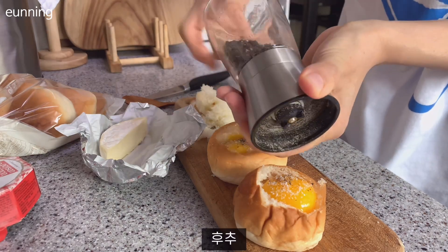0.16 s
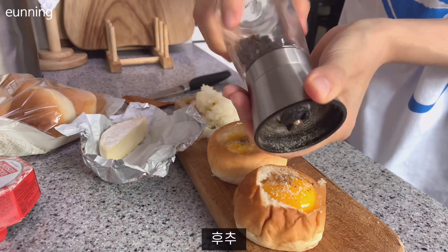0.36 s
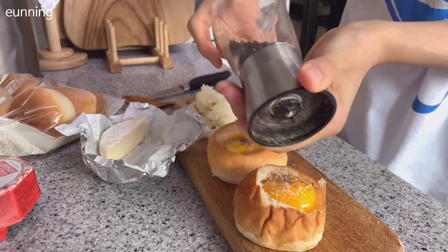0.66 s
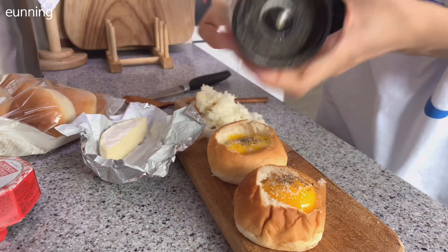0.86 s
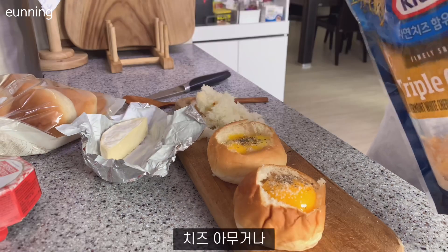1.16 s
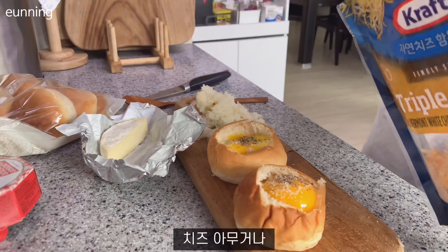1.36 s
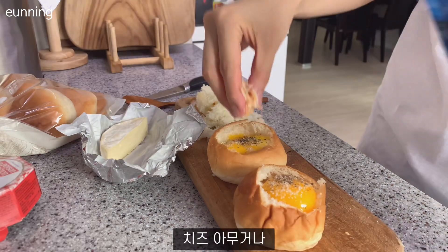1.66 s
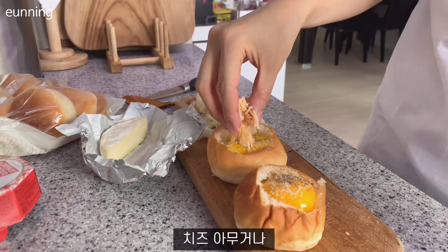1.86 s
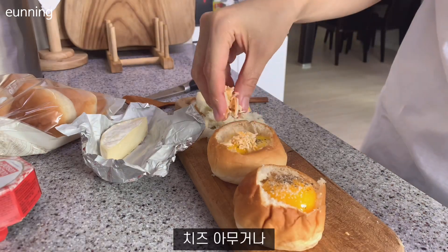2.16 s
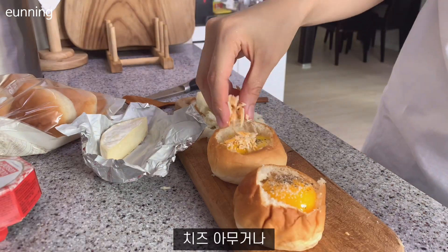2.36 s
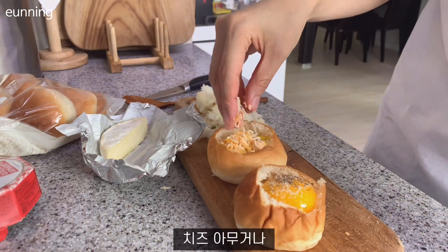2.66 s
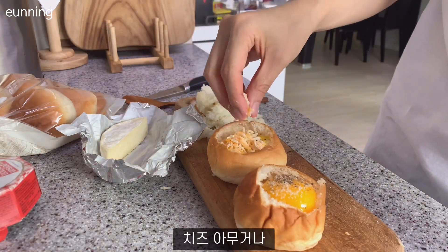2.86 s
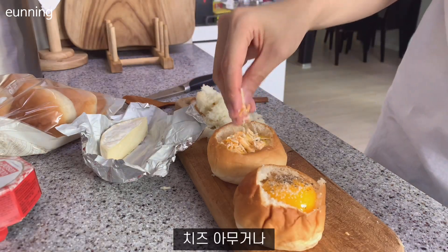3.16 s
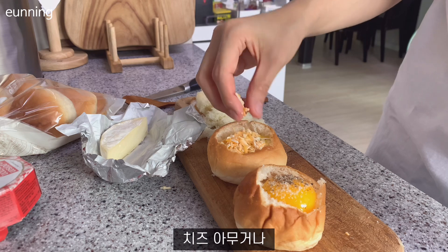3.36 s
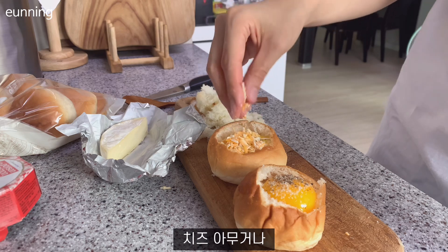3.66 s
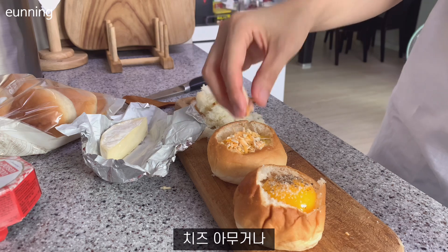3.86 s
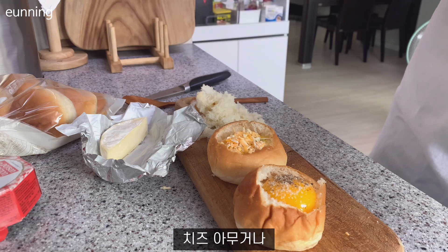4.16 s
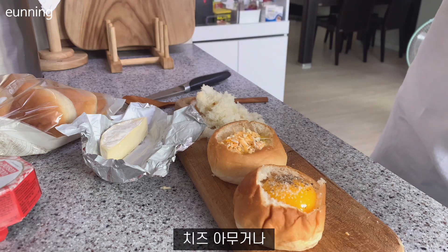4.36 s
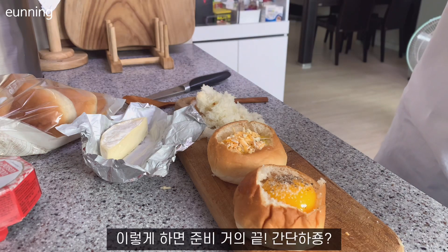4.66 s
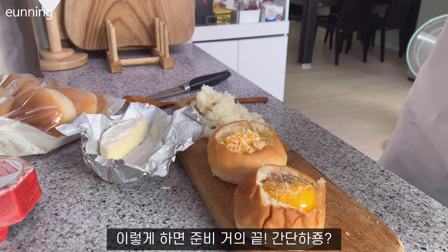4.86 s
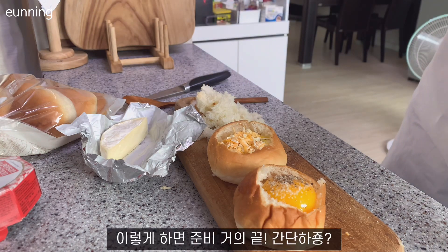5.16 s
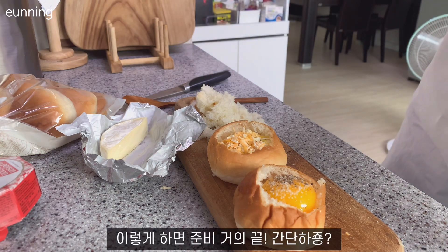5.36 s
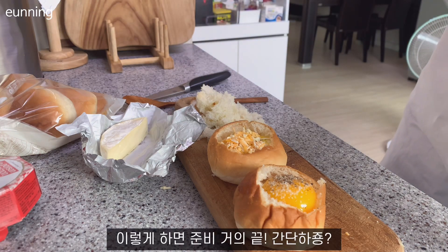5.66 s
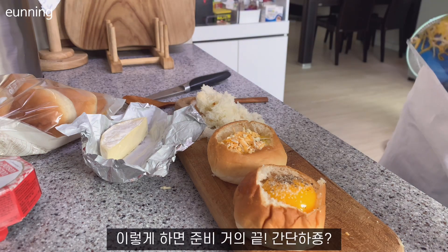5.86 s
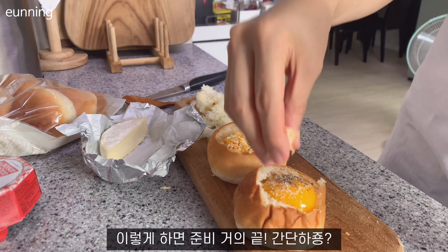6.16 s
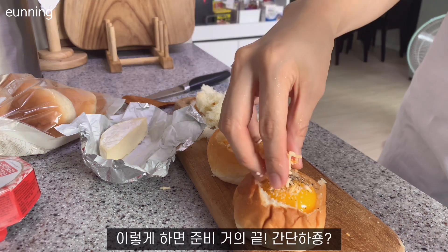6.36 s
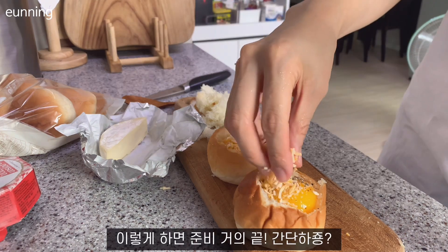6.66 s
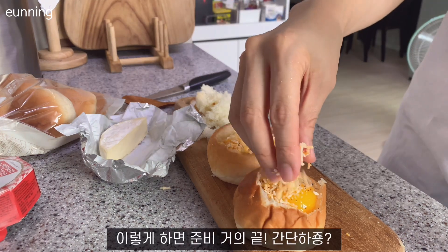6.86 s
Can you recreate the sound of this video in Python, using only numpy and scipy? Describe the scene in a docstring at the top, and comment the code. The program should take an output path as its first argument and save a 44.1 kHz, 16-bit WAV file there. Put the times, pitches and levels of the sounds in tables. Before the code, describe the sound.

Corns tinkle on glass and crack in a turning mill, with the sound abruptly cut before one second. A few isolated plastic creases follow over steady low rumble and faint airy hiss. After a tiny dropout near four seconds, a filled bag rustles and snaps thickly for nearly two seconds, with soft low thumps, then settles; one late crease. Close, small stereo microphones in a kitchen.

```python
"""In a small kitchen humming with appliances, a pepper mill twisted over bread rolls is heard for just under a second:
corns crack as clicks that ring the mill body, and tinkle as tiny hits on narrow glass tones. The mill sound ends
abruptly; then a plastic bag of grated cheese snaps now and then. From about 4.2 s it is worked hard, with rustling
of dense tiny slips and soft low thumps, and one late crease near 6.9 s. The sound drops out briefly at 0.95 and
4.04 s. Two microphone ports a few centimetres apart hear it all, the left one slightly later."""
import sys
import numpy as np
from scipy import signal
from scipy.fft import rfft, irfft
from scipy.io import wavfile

SR = 44100
rng = np.random.default_rng(int(sys.argv[2]) if len(sys.argv) > 2 else 0)


def inscribe(sig):
    """Save sig as 16-bit PCM at rate SR to the path in sys.argv[1].

    A 1-D sig is mono; a 2-D sig holds one channel per row.
    Samples are clipped to [-1, 1] before scaling.
    """
    pcm = np.round(np.clip(np.atleast_2d(sig).T, -1, 1) * 32767)
    wavfile.write(sys.argv[1], SR, pcm.astype(np.int16))


N = 308700
TIME = np.arange(N) / SR  # s
HZ = np.maximum(np.fft.rfftfreq(N, 1 / SR), 1)

# Levels of mill and bag parts are those before the path to the ports (PATH_COLOUR).
# kitchen background, louder while the bag is worked: [t/s, rumble with hum level/dB]
ROOM_LEVEL = [(0.0, -46.5), (4.1, -46.5), (4.6, -43.5), (5.2, -43), (5.36, -48.5), (5.5, -43), (5.67, -43),
              (5.88, -44), (6.3, -46.5), (7.0, -45)]
# spectrum shape of the rumble: [f/Hz, relative level per Hz/dB]
RUMBLE_SHAPE = [(24, -35), (33, -5.5), (48, -12), (62, -2.5), (85, -12.5), (125, -10), (170, -18),
                (240, -19.5), (300, -24.5), (400, -32)]
# motor tones: [f/Hz, width/Hz, level/dB on the scale where the rumble is RUMBLE_MIX_DB]
MOTOR_TONES = [(55.5, 9, -55), (72.85, 7.1, -55.5), (110, 9.1, -59), (141.84, 8.6, -55.5),
               (256.95, 6.66, -61.5), (281.8, 15, -66), (643.5, 4.5, -75)]
RUMBLE_MIX_DB = -50.5  # only sets rumble against tones
# spectrum shape of the airy hiss: [f/Hz, relative level per Hz/dB]
AIR_SHAPE = [(250, -7.5), (420, -4), (620, 0), (900, -4.5), (1250, 0), (1900, -9), (2400, -12), (3500, -19),
             (5000, -19.5), (5800, -19), (6800, -28.5), (9000, -29.5), (15000, -35), (15800, -54)]
AIR_DB = -61.5  # wavers a little around this

# the pair of ports: [f/Hz, likeness for the background (0-1), likeness for near sounds (0-1),
# left minus right level/dB, extra left lag/rad]
PORT_PAIR = [(60.3, 1, 0.7, -1, 0.07), (207, 0.96, 0.78, 0.5, -0.04), (405, 0.32, 0.47, -1, 0.15),
             (525, 0.22, 0.47, -4.5, -0.45), (710, 0.16, 0.72, 0, 1.05), (970, 0.02, 0.73, -0.5, 1.94),
             (2540, 0, 0.4, -0.5, -1.45), (3880, 0.08, 0.71, -1, -0.9), (4880, 0, 0.22, -1, -2.3),
             (6400, 0, 0.1, -3.5, -1.5), (8500, 0.63, 0.74, -1.5, -0.8), (10540, 0.8, 0.87, 1.5, 0.5),
             (11600, 1, 1, -2, -0.28), (13400, 1, 0.85, 1, -0.1), (15000, 1, 0.84, -3, -1)]
LEFT_LAG_S = 8 / SR
# path from mill and bag to the ports: [f/Hz, gain/dB]
PATH_COLOUR = [(350, -3.5), (700, -1), (1000, -6), (1300, -3), (5000, -4.5), (8000, -4.5), (9000, -3.5),
               (10500, -5), (13000, -7.5), (15500, -11)]
# mill, and bag at first, are further left: less lag, below this pitch
LEFT_SHIFT_S, SHIFT_TOP_HZ = -0.00014, 6600
BAG_LEFT_UNTIL_S = 4
PAN_DB, PAN_SPREAD_DB = -1, 2  # where cracks and snaps fall, left minus right

# pitch ranges called lows, mids, upper mids, highs: [low edge f/Hz, high edge f/Hz]
REGISTER_EDGES = [(400, 1700), (1700, 3500), (3500, 6500), (6500, 15800)]
LOW_TOP_HZ, MID_TOP_HZ = 1850, 3200  # limits of low and mid tones in rubbing sounds
ATTACK_SAMPLES = round(.004 * SR)

# corns cracking in the burr: [t/s, low ring f/Hz, high ring f/Hz,
# attack level/dB in lows, mids, upper mids, highs]
CORN_CRACKS = [(0.3417, 1400, 3700, -65, -35, -38, -44), (0.3625, 506, 3570, -55, -46, -45, -40),
               (0.3973, 1640, 2990, -38, -26, -27.5, -23), (0.4105, 1650, 3290, -49, -50, -46, -43),
               (0.4201, 1600, 3370, -47.5, -41, -41.5, -39), (0.878, 480, 6200, -60, -73, -55, -45),
               (0.9328, 1500, 4900, -52, -64, -60, -50)]
# single corns on the glass: [t/s, strength/dB before TINK_LIFT_DB and the glass tones]
CORN_TINKS = [(0.006, -43), (0.0112, -44), (0.019, -44), (0.032, -39), (0.0381, -42), (0.046, -39),
              (0.052, -41), (0.0555, -36), (0.0673, -39), (0.0711, -39), (0.0801, -47), (0.083, -41),
              (0.1174, -35.5), (0.4587, -37), (0.464, -44), (0.472, -34), (0.4807, -35), (0.4861, -39),
              (0.4912, -26.5), (0.5024, -34), (0.508, -40), (0.5119, -39), (0.517, -37), (0.5196, -38),
              (0.5285, -43), (0.5327, -30), (0.538, -30), (0.5428, -39), (0.5481, -38), (0.5534, -38),
              (0.5579, -46), (0.5926, -38), (0.8793, -44), (0.919, -41), (0.9327, -47)]
TINK_LIFT_DB = 30.5
# ringing tones of the glass: [f/Hz, width/Hz, relative level/dB]
GLASS_MODES = [(7330, 200, -7), (7700, 260, -9), (10360, 250, -11), (11350, 210, 7), (11570, 150, 2),
               (5400, 900, -25)]
# ringing tones of the mill body: [f/Hz, width/Hz, relative level/dB]
MILL_MODES = [(900, 860, -13), (1760, 90, -2.5), (2370, 680, -2), (3320, 480, -2), (3800, 400, -4),
              (4250, 420, -3), (5430, 600, -4.5), (6030, 950, -5.5), (7700, 360, -13)]
# the burr bites as the mill turns: [t/s, held/s, crunch level/dB before the body tones]
BURR_BITES = [(0, 0.0066, -47), (0.343, 0.042, -53.5), (0.403, 0.006, -44), (0.416, 0.013, -43),
              (0.883, 0.005, -65), (0.935, 0.01, -60.5)]
BITE_RISE_DB_PER_S, BITE_FALL_DB_PER_S = 904, 376
BITE_LOWS_DB, BITE_HIGHS_DB = -3.5, -6  # relative to the crunch
# corns sliding along the glass after a twist: [t/s, held/s, tinkle level/dB before the glass tones]
CORN_SLIDES = [(0.04, 0.046, -40.5), (0.46, 0.033, -45), (0.5, 0.049, -41.5), (0.89, 0.037, -54.5),
               (0.934, 0.015, -46)]
SLIDE_RISE_DB_PER_S, SLIDE_FALL_DB_PER_S = 280, 341
SLIDE_HISS_DB = -9.5  # treble hiss of the sliding corns, relative to their tinkle
MILL_HISS_DB, MILL_HISS_HZ = -68, (2000, 7500)  # faint steady hiss, heard between the bites
MILL_SOUND_END_S = .9475

# the filled bag bumps and slumps: [t/s, f/Hz, peak level/dB]
BAG_THUMPS = [(1.22, 200, -44), (1.322, 150, -42), (4.186, 222, -43), (4.35, 70, -40), (4.44, 170, -41),
              (4.535, 62, -42), (4.572, 68, -36), (4.574, 160, -44), (4.62, 281, -44.5), (4.698, 121, -39),
              (4.808, 150, -38), (5.075, 118, -40), (5.11, 160, -43), (5.155, 250, -46), (5.518, 61.7, -40),
              (5.68, 270, -46), (5.765, 62, -40), (5.85, 61.3, -37)]
THUMP_CYCLES = 1.28  # to the top of the swell; it sinks a little more slowly
# loud creases of the bag snapping: [t/s, low ring f/Hz, high ring f/Hz,
# attack level/dB in lows, mids, upper mids, highs]
BAG_SNAPS = [(1.1256, 1140, 4120, -70, -60, -48, -53.5), (1.2198, 835, 1860, -35, -30, -36, -43),
             (1.2555, 1480, 2070, -60, -53, -56, -55), (1.2768, 540, 2130, -48.5, -38.5, -53, -52),
             (1.2985, 610, 2090, -54, -50, -63, -62), (1.3084, 880, 2080, -46, -46, -60, -66),
             (1.3221, 1140, 2440, -40, -45, -50, -50), (1.3297, 1140, 6150, -58, -62, -50, -42),
             (1.3465, 850, 4730, -60, -69, -50, -53), (1.4665, 1190, 1836, -64, -73, -68, -61),
             (1.8172, 1270, 2000, -40, -46.5, -78, -73), (2.3791, 1400, 5600, -59, -72, -55, -59.5),
             (2.397, 1400, 2920, -74, -60, -63, -68), (2.9438, 700, 1800, -39, -39, -38.5, -45),
             (4.1858, 1400, 1960, -42, -42, -42, -27), (4.194, 485, 1960, -49, -44, -44, -31),
             (4.2309, 1350, 2980, -43, -36, -42, -41), (4.338, 1420, 2080, -45, -39.5, -48, -39),
             (4.4074, 570, 4060, -63, -54, -37, -34), (4.4379, 1450, 4070, -34, -39, -34, -27.5),
             (4.448, 570, 4060, -45, -43, -35, -44), (4.4575, 485, 3430, -42, -50, -48, -30.5),
             (4.545, 1300, 1810, -37, -37, -44, -33), (4.5737, 1480, 2060, -31.5, -32, -45, -36),
             (4.598, 900, 2660, -42, -32, -43, -40), (4.6219, 860, 2460, -32.5, -43, -50, -45),
             (4.674, 960, 2350, -39.5, -40, -48, -65), (4.6924, 476, 2400, -47, -26, -45, -32.5),
             (4.7142, 1110, 2040, -36, -29.5, -34, -42), (4.7389, 1370, 4100, -36, -36, -24.5, -28),
             (4.7455, 1250, 4120, -47, -29, -29.5, -48), (4.8054, 590, 2780, -42.5, -29, -35, -42.5),
             (4.8581, 600, 3600, -32.5, -38.5, -31.5, -49), (4.9878, 477, 3000, -61, -56, -55, -39.5),
             (5.001, 640, 2290, -58, -56, -53, -43), (5.0199, 1430, 4810, -51, -56, -56, -31),
             (5.0546, 555, 4400, -42, -49, -38.5, -33.5), (5.0674, 770, 2450, -37, -39, -42, -55),
             (5.124, 1400, 1730, -40, -40.5, -49, -48), (5.1371, 830, 1800, -37.5, -42, -61, -65),
             (5.1725, 850, 2250, -38, -52, -64, -68), (5.201, 850, 4800, -40.5, -45, -36, -44.5),
             (5.2824, 1170, 2700, -39, -37.5, -48, -53), (5.3318, 1170, 2040, -59, -47, -55, -56),
             (5.3604, 1020, 2720, -55, -31.5, -44.5, -38), (5.3876, 670, 2040, -58, -41, -41.5, -48),
             (5.448, 540, 3540, -53, -53, -46, -49), (5.548, 850, 2000, -34, -30.5, -28.5, -41.5),
             (5.6007, 1430, 2050, -51, -45, -60, -69), (5.615, 840, 2710, -44, -53, -50, -61),
             (5.6249, 850, 2760, -42.5, -37, -42.5, -50), (5.7097, 540, 3420, -48.5, -53, -35.5, -41),
             (5.7246, 1420, 1990, -32.5, -37.5, -43, -53), (5.7614, 870, 1950, -27.5, -38, -51, -62),
             (5.771, 860, 2030, -36, -37, -43, -39), (5.8002, 880, 2770, -39, -30, -44.5, -38),
             (5.822, 1100, 2050, -41, -53, -55, -38), (5.8438, 1320, 2670, -53, -53, -55, -46),
             (5.857, 630, 3030, -46.5, -43, -63, -68), (5.8871, 480, 2050, -61, -71, -61, -57),
             (5.9358, 570, 2070, -58, -42, -53, -62), (5.944, 1650, 1770, -55, -42, -60, -70),
             (5.9733, 1150, 1980, -39.5, -44, -49, -61), (5.992, 537, 1900, -47.5, -39, -67, -81),
             (6.0148, 650, 2000, -53, -42, -52, -39), (6.1373, 1320, 2760, -60, -56, -61, -66),
             (6.1574, 650, 2800, -62, -58, -62, -61.5), (6.855, 580, 1960, -51, -43, -49.5, -56)]
# ringing patches of the film: [f/Hz, width/Hz, relative level/dB]
BAG_MODES = [(198, 89, -2.5), (334, 170, -8), (476, 55, -0.5), (617, 110, 2), (870, 120, 3), (1153, 57, 6),
             (1387, 380, 5), (1980, 170, 3.5), (2364, 233, -2), (2864, 230, 2.5), (3490, 500, 0),
             (4120, 310, -1.5), (4650, 850, 2), (5930, 700, -9.5)]
# where the stretched film rings most: [t/s, centre f/Hz, lift/dB]
FILM_FOCUS = [(4.18, 3000, -6), (4.3, 3320, 5), (4.4, 4150, 6), (4.46, 4600, 6), (4.52, 4160, 11),
              (4.535, 3550, 14), (4.57, 3480, 7), (4.6, 2600, 8), (4.66, 2600, 4)]
# the hand squeezes the bag: [t/s, held/s, rustle level/dB before the film tones,
# then relative level/dB of lows, upper mids, highs]
BAG_SQUEEZES = [(0.96, 0.14, -70.5, 6.5, -3, -15), (1.15, 0.074, -62, -2.5, -1, -2),
                (1.23, 0.015, -52.5, -5.5, -2, -18), (1.295, 0.041, -59, -7, 0, -3),
                (1.37, 0.1, -71, 2, 2, -8), (2.235, 0.0078, -60, -2, -2, -18),
                (2.385, 0.014, -70, -4, 0, -2), (2.77, 0.023, -72, -2, 3, -9),
                (2.96, 0.0092, -60, -2, -3, -14), (4.187, 0.05, -44, -6, -0.5, 3.5),
                (4.26, 0.066, -51.5, -3, 1.5, -1), (4.315, 0.15, -50, -3, 4.5, 4.5),
                (4.436, 0.033, -42.5, -0.5, 5, 6), (4.49, 0.091, -42.5, -1.5, 5, 4.5),
                (4.61, 0.08, -59, 6, -2, -8), (4.695, 0.048, -45.5, -4, -0.5, -12),
                (4.77, 0.13, -56, 2, 0, -13), (4.92, 0.055, -58, -1, 1, -16),
                (4.99, 0.086, -49.5, -5.5, 1.5, 1), (5.08, 0.08, -51.5, 2, -2.5, -9),
                (5.19, 0.15, -60, 0, -3, -25), (5.36, 0.14, -53, -2, -4, -12), (5.51, 0.032, -51, 0, 2, -3),
                (5.553, 0.015, -50, -2, 1, -5), (5.59, 0.05, -56, 1, -3, -10),
                (5.66, 0.09, -55, 0.5, 0, -10), (5.765, 0.07, -48.5, 0.5, -2.5, -1.5),
                (5.93, 0.14, -66.5, 2, -1, -15), (6.04, 0.12, -73, 6.5, -4, -10),
                (6.865, 0.004, -63.5, 6.5, -8, -24)]
SQUEEZE_RISE_DB_PER_S, SQUEEZE_FALL_DB_PER_S = 1202, 302

# all sound drops out for a moment: [t/s]
DROPOUTS_S = [.9475, 4.041]
DROPOUT_RETURN_S = 0.016
CUTOFF_HZ = 16800


def amp(db):
    """Gain of a level in dB."""
    return 10 ** (np.asarray(db) / 20)


def rms_one(x):
    """Scale to an average strength (rms) of 1."""
    return x / np.sqrt(np.mean(x ** 2) + 1e-20)


def attack_one(x):
    """Scale so that the first 4 ms have rms 1 on each path."""
    return x / np.sqrt(np.mean(x[:, :ATTACK_SAMPLES] ** 2, axis=1, keepdims=True))


def at_hz(points, column=1):
    """Read a table at every frequency of the spectrum, on a log pitch scale."""
    points = np.array(points)
    return np.interp(np.log(HZ), np.log(points[:, 0]), points[:, column])


def drift(per_s):
    """Slow random wandering: straight lines between random points of spread 1."""
    count = round(N / SR * per_s) + 2
    return np.interp(TIME, np.linspace(0, N / SR, count), rng.standard_normal(count))


def band(x, low_hz, high_hz):
    """Keep one pitch range, scaled so that unit white noise comes out at rms 1."""
    sos = signal.butter(2, [low_hz, min(high_hz, .45 * SR)], "band", fs=SR, output="sos")
    return signal.sosfilt(sos, x) * np.sqrt(SR / 2 / (high_hz - low_hz))


def resonance(x, hz, width_hz):
    """Let one tone ring (two-pole filter), with gain 1 on top; a narrow one rings longer."""
    r = np.exp(-np.pi * width_hz / SR)
    feedback = [1, -2 * r * np.cos(2 * np.pi * hz / SR), r * r]
    return signal.lfilter([(1 - r * r) / 2, 0, (r * r - 1) / 2], feedback, x)


def ring(x, hz, width_hz, db):
    """Ring one body tone, scaled so that unit white noise comes out near the given level."""
    return amp(db) * resonance(x, hz, width_hz) * np.sqrt(SR / np.pi / width_hz)


def dying(clicks, t60):
    """Give each click an exponential decay that falls 60 dB in t60 seconds."""
    return signal.lfilter([1], [1, -amp(-60 / (t60 * SR))], clicks + 1e-18)


def grains(per_s, spread_db, size=N):
    """Random clicks, few of them large."""
    draw, out = rng.random(size) * SR / per_s, np.zeros(size)
    hit = draw < 1
    out[hit] = amp(spread_db * np.minimum(-np.log(draw[hit] + 1e-9), 4))
    return out


def efforts(rows, rise_db_per_s, fall_db_per_s):
    """Loudness curves that rise, hold and fall, powers adding: the level, then each relative column."""
    s, held, db, *relative = np.transpose(rows)
    t = TIME[::50]
    before = np.maximum(s[:, None] - t, 0)
    after = np.maximum(t - (s + held)[:, None], 0)
    shape = amp(-rise_db_per_s * before - fall_db_per_s * after)
    return [np.interp(TIME, t, np.sqrt(amp(db + c) ** 2 @ shape ** 2)) for c in [0] + relative]


def friction(envelopes, modes, focus, per_s, spread_db, t60, smooth, crinkle, shift_db, body_db, size):
    """Rubbing: dense tiny slips over a smooth part; crinkles reach all tones, own slips come and go in each."""
    level, lows, upper, highs = (c[:size] for c in envelopes)
    s, centre_hz, lift_db = np.transpose(focus)
    centre_hz, lift_db = np.interp(TIME, s, centre_hz)[:size], np.interp(TIME, s, lift_db)[:size]
    white = rng.standard_normal((2, 3, size))
    shared = smooth + crinkle * rms_one(dying(grains(per_s / 4, spread_db, size), t60 / 2))
    hiss_slips = rms_one(rms_one(dying(grains(per_s, spread_db, size), t60)) + shared)
    out = highs * band(hiss_slips * white[0], 5100, 15200)
    for k, (hz, width_hz, db) in enumerate(modes):
        slips = rms_one(rms_one(dying(grains(per_s / 3, spread_db, size), t60)) + shared)
        nearness = np.exp(-(np.log(hz / centre_hz) / 0.099) ** 2)
        slips *= amp(shift_db * drift(14.0)[:size] + lift_db * nearness)
        envelope = lows if hz < LOW_TOP_HZ else level if hz < MID_TOP_HZ else upper
        out += ring(slips * white[1 - k % 2], hz, width_hz, db + body_db) * envelope
    return np.pad(out, ((0, 0), (0, N - size)))


def tilted(x, levels_db):
    """Set one level at the centre of each register, smoothly between, without ringing ahead of time."""
    size = 4096
    hz = np.maximum(np.fft.rfftfreq(size, 1 / SR), 1)
    centres = np.log(REGISTER_EDGES).mean(axis=1)
    log_gain = np.log(amp(np.interp(np.log(hz), centres, levels_db)))
    # folding the cepstrum onto positive times makes the filter act only after its input
    folded = irfft(log_gain) * np.r_[1, 2 * np.ones(size // 2 - 1), 1, np.zeros(size // 2 - 1)]
    return irfft(rfft(x, size) * np.exp(rfft(folded)))[:, :x.shape[1]]


def snaps(rows, modes, click_db, t60, ring_share, ring_cycles, tail_db, tail_t60, high_tail_db):
    """A click and short rattle ring the body, two patches above all; a ragged tail follows."""
    t = TIME[:SR // 20]
    rise = 1 - np.exp(-t / 0.00051)  # the rattle takes a moment
    attack, tail = rise * amp(-60 * t / t60), rise * amp(-60 * t / tail_t60)
    tail_gains = amp([[[tail_db]], [[high_tail_db]]])  # for the body, then for the highs
    filters = [signal.butter(3, edges, "band", fs=SR, output="sos") for edges in REGISTER_EDGES]
    for s, low_hz, high_hz, *levels_db in rows:
        pan_db = PAN_DB + PAN_SPREAD_DB * rng.standard_normal()
        white = rng.standard_normal((2, 3, len(t)))
        strength_db = 1.45 * rng.standard_normal(len(modes))
        ragged = amp(3.0 * np.repeat(rng.standard_normal(35), 63))  # the tail comes in uneven bits
        burst = white * (attack + tail_gains * tail * ragged)
        burst[:, 0, 0] += amp(click_db)
        # reflections within a millisecond
        burst[:, [1, 2], rng.integers(0, 40, 2)] += amp(click_db) * rng.choice([-1, 1], 2)
        patches = sum(attack_one(resonance(burst[0], hz, hz / ring_cycles)) for hz in (low_hz, high_hz))
        body = 0
        for k, ((hz, width_hz, level_db), own_db) in enumerate(zip(modes, strength_db)):
            body = body + (-1) ** k * ring(burst[0], hz, width_hz, level_db + own_db)
        rung = ring_share * patches + attack_one(body)
        treble = attack_one(burst[1]) + 0.14 * rung
        sources = (rung, rung, rung, treble)
        sound = sum(attack_one(signal.sosfilt(sos, x)) for sos, x in zip(filters, sources))
        yield round(s * SR), tilted(sound, levels_db), pan_db


def placed(events):
    """Put events on the three paths; the pan weights each port's own path."""
    out = np.zeros((3, N + SR))
    for at, sound, pan_db in events:
        out[:, at:at + sound.shape[1]] += sound * amp([[0], [pan_db / 2], [-pan_db / 2]])
    return out[:, :N]


def ports(paths, column, shift_s=0, colour_db=0):
    """Mix three paths: one shared by both ports, late on the left, and one of its own for each."""
    shared, left, right = rfft(paths) * amp(colour_db)
    alike = np.clip(at_hz(PORT_PAIR, column), 0, 1)
    lean = amp(at_hz(PORT_PAIR, column=3) / 2)
    lag_s = LEFT_LAG_S + shift_s * np.exp(-(HZ / SHIFT_TOP_HZ) ** 6)
    late = shared * np.exp(-1j * (2 * np.pi * HZ * lag_s + at_hz(PORT_PAIR, column=4)))
    pair = np.sqrt(alike) * np.array([late, shared]) + np.sqrt(1 - alike) * np.array([left, right])
    return irfft(pair * [lean, 1 / lean], N)


def kitchen():
    """Appliances: shaped noise as rumble, narrow noise as wavering motor tones, and a faint airy hiss."""
    s, rumble_db = np.transpose(ROOM_LEVEL)
    white = rng.standard_normal((3, 3, N))
    rumble = rms_one(irfft(rfft(white[0]) * amp(at_hz(RUMBLE_SHAPE)) * (HZ < 600), N))
    low_sound = rumble * amp(RUMBLE_MIX_DB)
    for hz, width_hz, db in MOTOR_TONES:
        tone = resonance(resonance(white[1], hz, width_hz), hz, width_hz)
        low_sound = low_sound + amp(db) * rms_one(tone)
    air = rms_one(irfft(rfft(white[2]) * amp(at_hz(AIR_SHAPE)) * (HZ > 200), N))
    low_sound = rms_one(low_sound) * amp(np.interp(TIME, s, rumble_db))
    return low_sound + air * amp(AIR_DB + 0.21 * drift(2.8))


def thumps():
    """Each bump is a soft swell of a cycle or two at the pitch of the slumping load."""
    out, t = np.zeros(N + SR), TIME[:SR // 5]
    for s, hz, db in BAG_THUMPS:
        age = t * hz / THUMP_CYCLES
        swell = age * np.exp(1 - age)
        out[round(s * SR):][:len(t)] += amp(db) * swell * np.sin(2 * np.pi * hz * t)
    return out[:N]


def plastic_bag():
    """Squeezed film rubs and rings in many patches, and its loud creases snap."""
    rustle = efforts(BAG_SQUEEZES, SQUEEZE_RISE_DB_PER_S, SQUEEZE_FALL_DB_PER_S)
    bag = friction(rustle, BAG_MODES, FILM_FOCUS, per_s=900, spread_db=4.0, t60=0.004, smooth=1.25,
                   crinkle=0.3, shift_db=3.0, body_db=-6.5, size=N)
    bag += placed(snaps(BAG_SNAPS, BAG_MODES, click_db=12.5, t60=0.0062, ring_share=1.68,
                        ring_cycles=7.5, tail_db=-9, tail_t60=0.06, high_tail_db=-6.0))
    return bag


def peppercorns(level):
    """Tiny hard touches ring the high glass tones; single corns strike each with a strength of its own."""
    rattle = rms_one(dying(grains(1200, 4.1, SR), 0.0055))
    touches = amp(11.5) * level[:SR] * rattle * rng.standard_normal((3, SR))
    s, tink_db = np.transpose(CORN_TINKS)
    strength_db = 1.8 * rng.standard_normal((len(s), len(GLASS_MODES)))
    out = 0
    for (hz, width_hz, db), own_db in zip(GLASS_MODES, strength_db.T):
        force = touches.copy()
        force[:, (s * SR).astype(int)] += amp(tink_db + TINK_LIFT_DB + own_db) * [[1], [1], [-1]]
        out = out + amp(db) * resonance(resonance(force, hz, width_hz), hz, 2.4 * width_hz)
    return np.pad(out, ((0, 0), (0, N - SR)))


def pepper_mill():
    """The biting burr rubs and cracks corns, ringing the mill body, while loose corns tinkle on the glass."""
    crunch, = efforts(BURR_BITES, BITE_RISE_DB_PER_S, BITE_FALL_DB_PER_S)
    slide, = efforts(CORN_SLIDES, SLIDE_RISE_DB_PER_S, SLIDE_FALL_DB_PER_S)
    highs = crunch * amp(BITE_HIGHS_DB) + slide * amp(SLIDE_HISS_DB)
    grind = (crunch, crunch * amp(BITE_LOWS_DB), crunch, highs)
    steady_focus = [(0, 3500, 1.5)]  # t/s, centre f/Hz, lift/dB
    mill = friction(grind, MILL_MODES, steady_focus, per_s=2000, spread_db=2.0, t60=0.0047, smooth=1.3,
                    crinkle=0.3, shift_db=3.0, body_db=-1.0, size=SR)
    mill += peppercorns(slide)
    mill[:, :SR] += amp(MILL_HISS_DB) * band(rng.standard_normal((3, SR)), *MILL_HISS_HZ)
    mill += placed(snaps(CORN_CRACKS, MILL_MODES, click_db=18, t60=0.006, ring_share=0.37,
                         ring_cycles=12.4, tail_db=-11.5, tail_t60=0.075, high_tail_db=-7.0))
    return mill * (TIME < MILL_SOUND_END_S)  # the mill sound is cut off here, ringing included


def scene():
    """Mill and bag close by, the kitchen around them, with brief dropouts."""
    heard = ports(kitchen() + thumps(), column=1)
    bag, mill = plastic_bag(), pepper_mill()
    early = TIME < BAG_LEFT_UNTIL_S
    for near, shift_s in [(mill + bag * early, LEFT_SHIFT_S), (bag * ~early, 0)]:
        heard += ports(near, column=2, shift_s=shift_s, colour_db=at_hz(PATH_COLOUR))
    for s in DROPOUTS_S:
        # silent at once, then back in a straight line
        heard *= np.where(TIME < s, 1, np.minimum((TIME - s) / DROPOUT_RETURN_S, 1))
    return heard


def record(dry):
    """Cut the very top of the treble with a steep low-pass filter."""
    return signal.sosfilt(signal.cheby2(12, 60, CUTOFF_HZ, fs=SR, output="sos"), dry)


dry = scene()
out = record(dry)
inscribe(out)
```